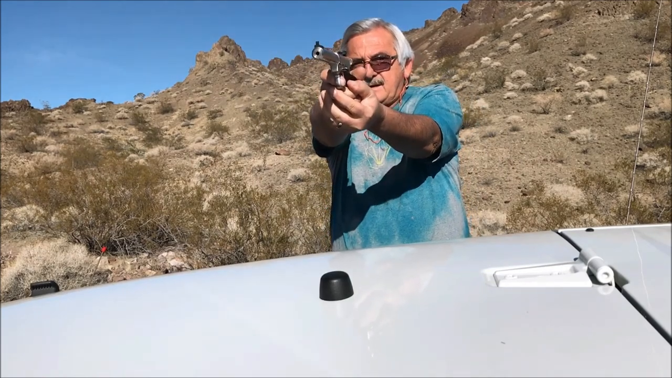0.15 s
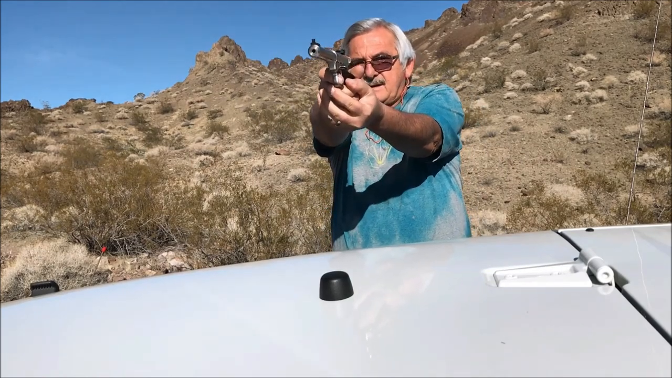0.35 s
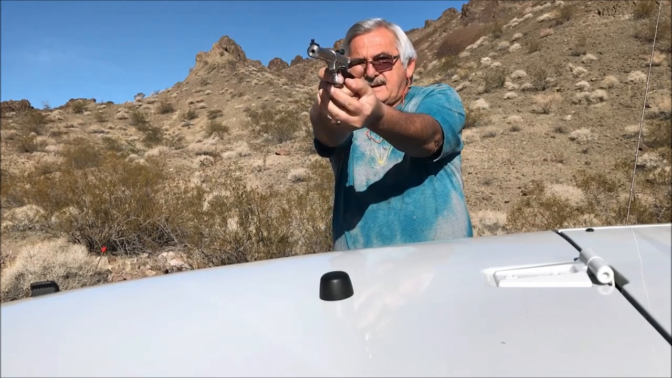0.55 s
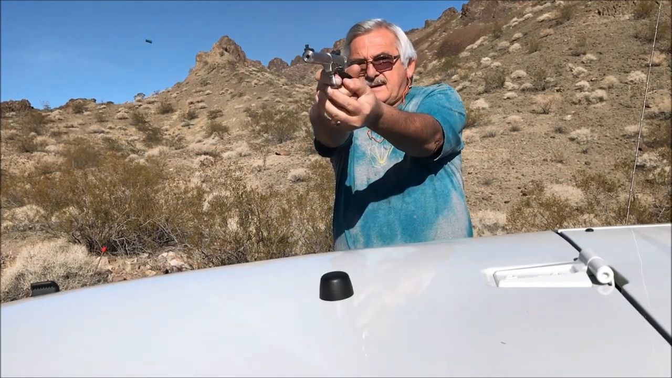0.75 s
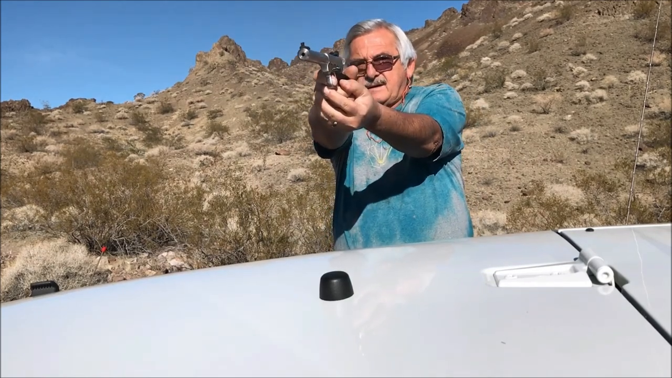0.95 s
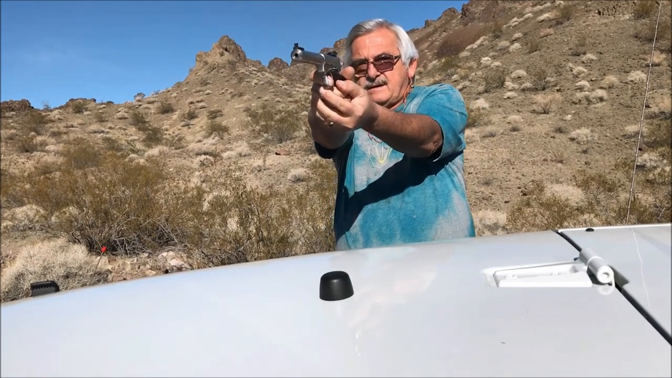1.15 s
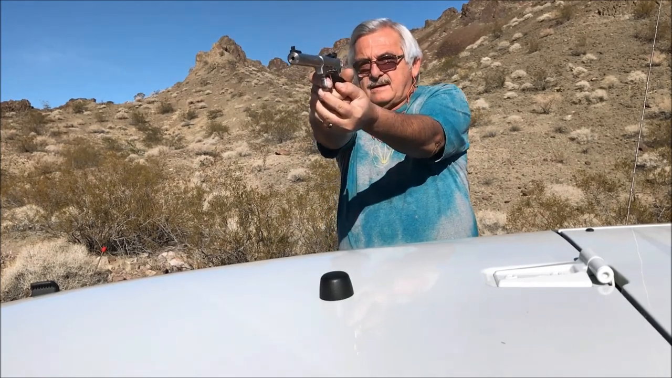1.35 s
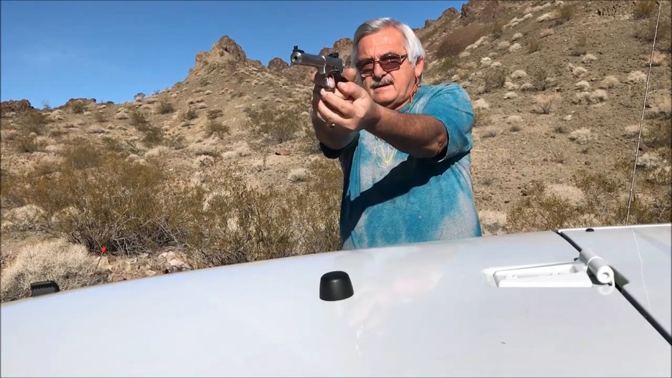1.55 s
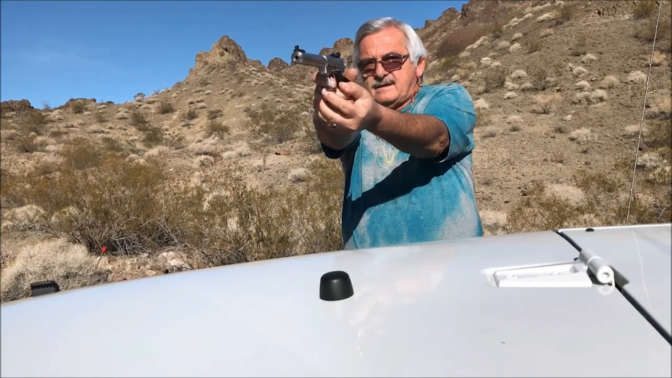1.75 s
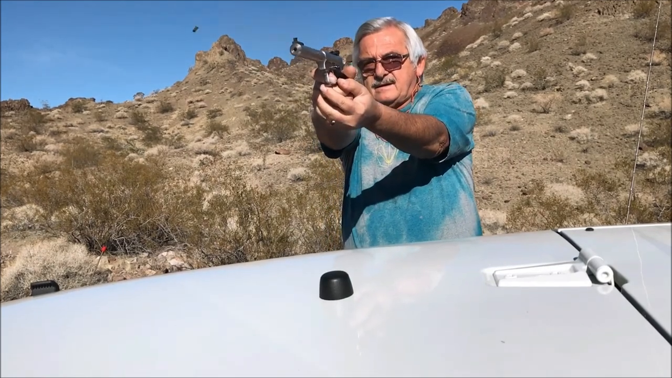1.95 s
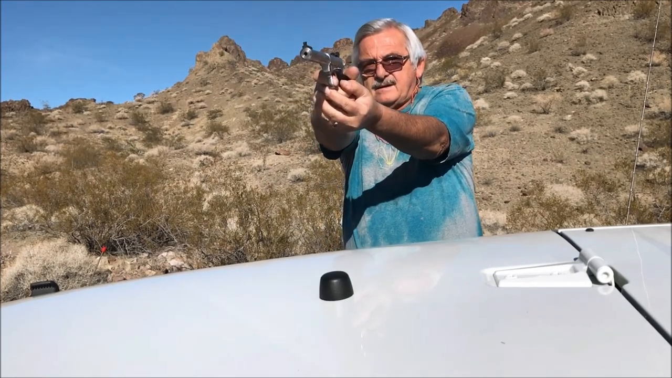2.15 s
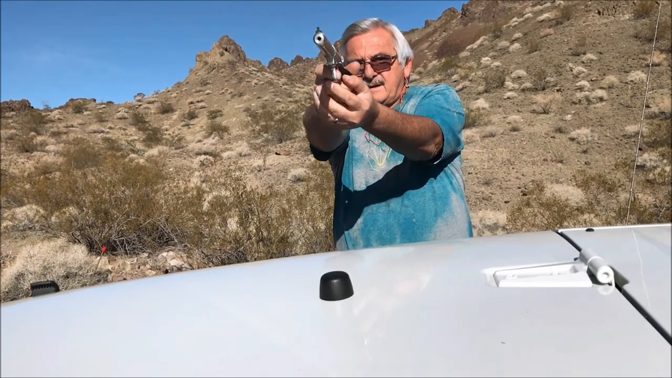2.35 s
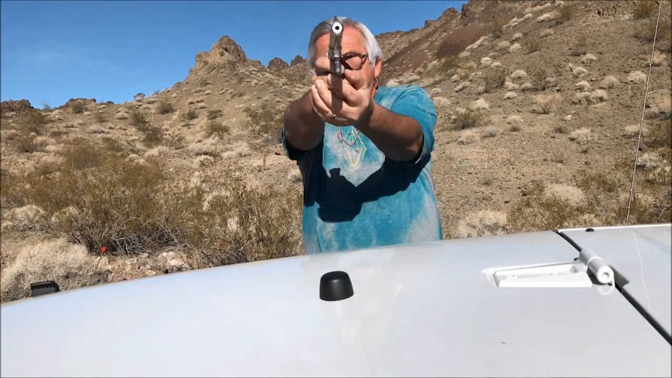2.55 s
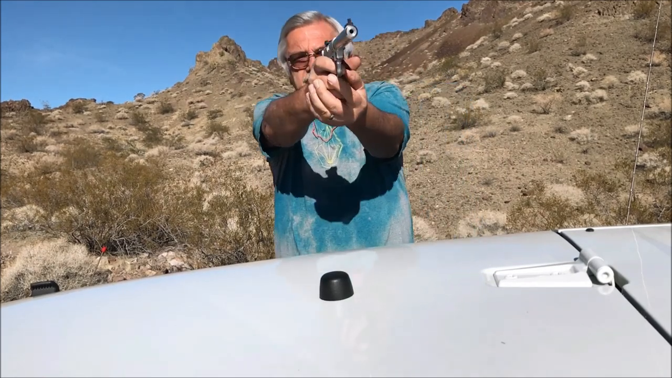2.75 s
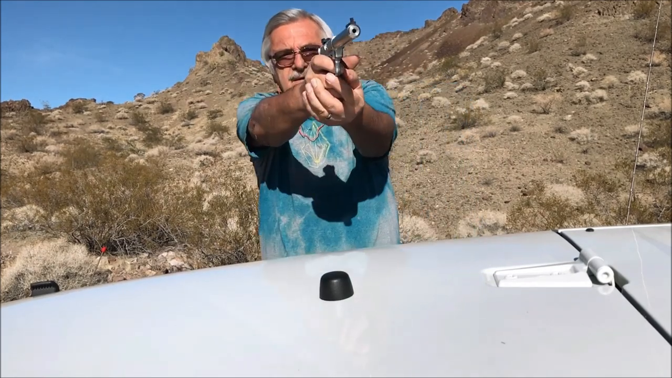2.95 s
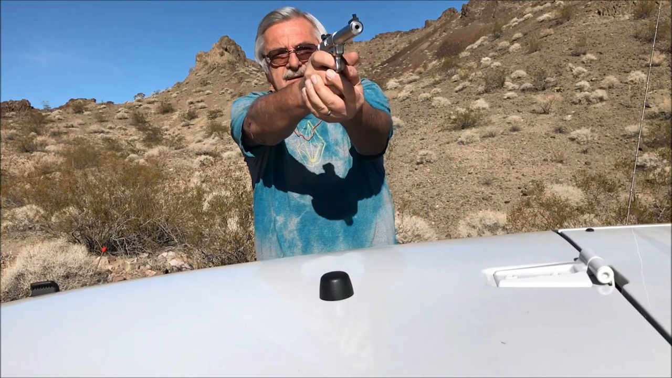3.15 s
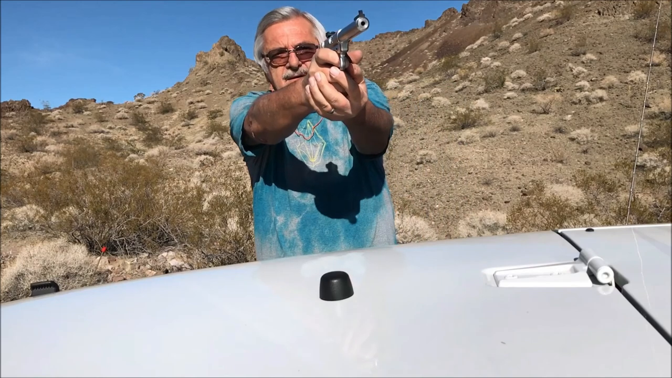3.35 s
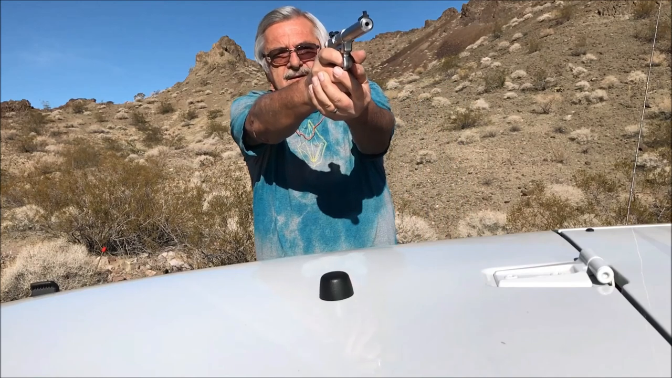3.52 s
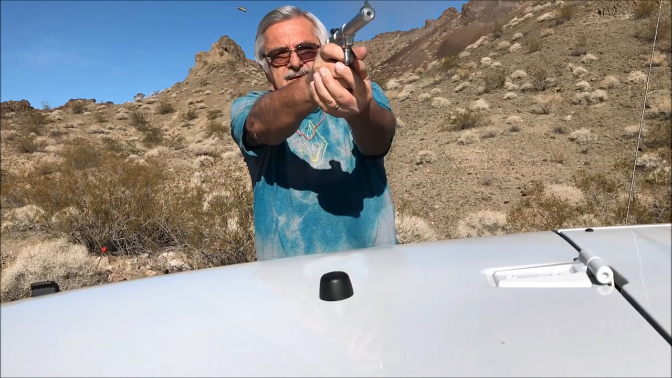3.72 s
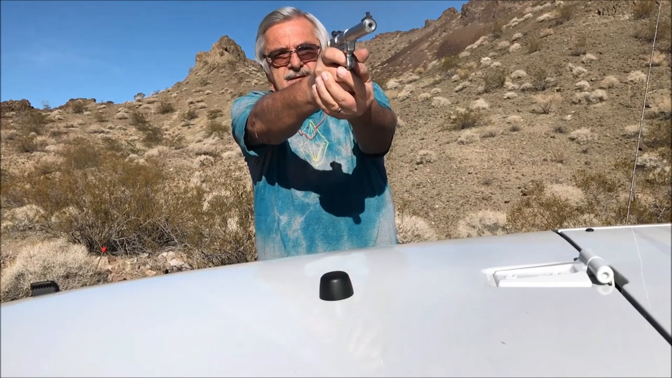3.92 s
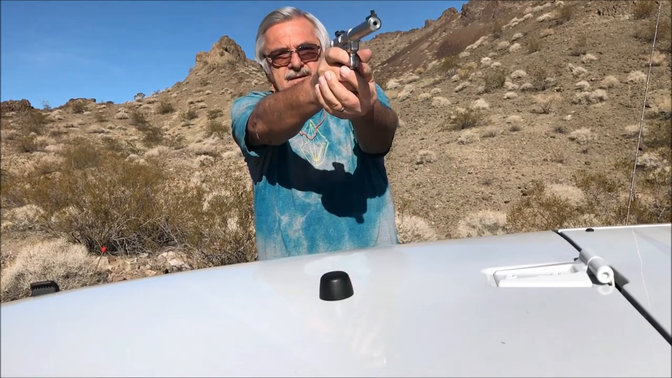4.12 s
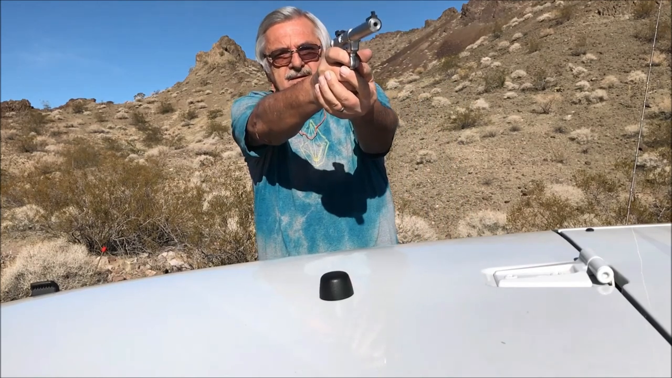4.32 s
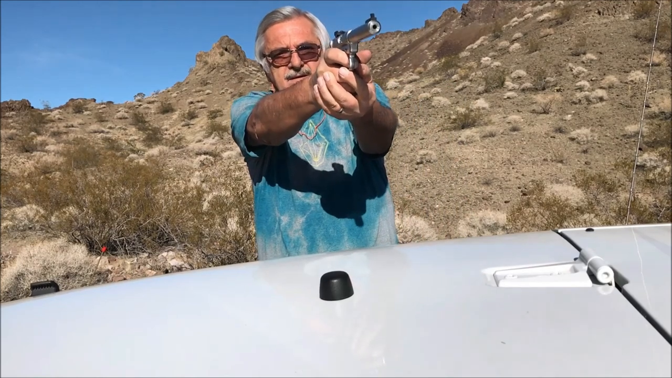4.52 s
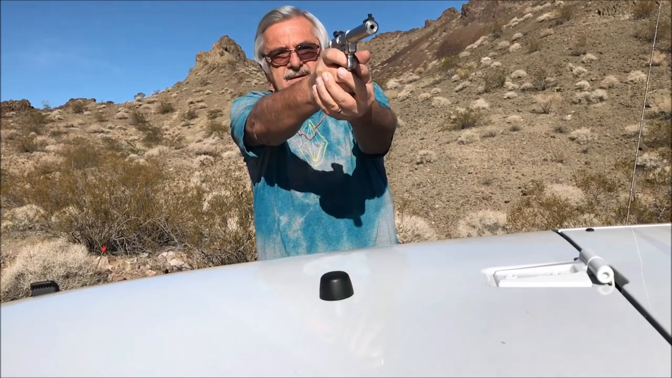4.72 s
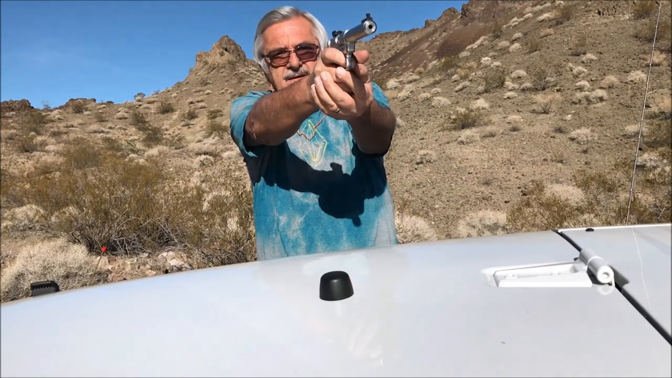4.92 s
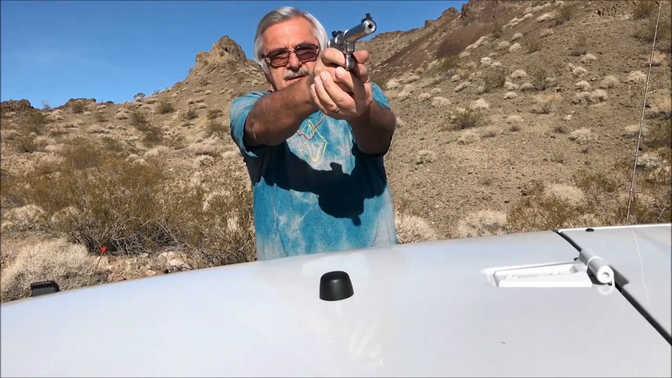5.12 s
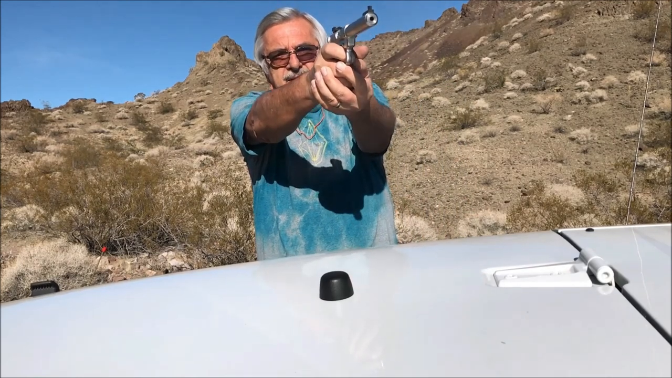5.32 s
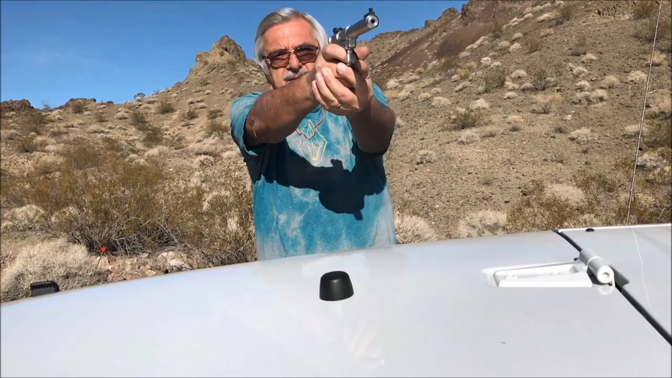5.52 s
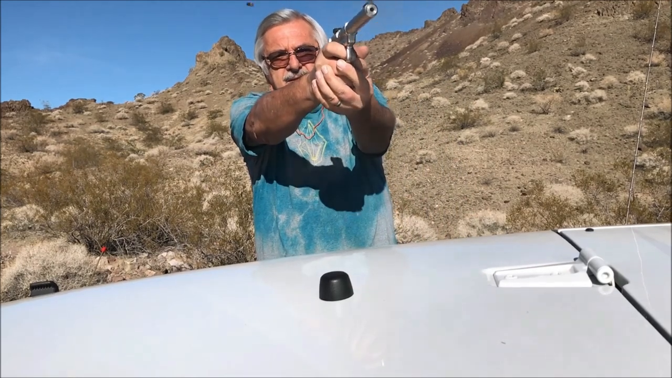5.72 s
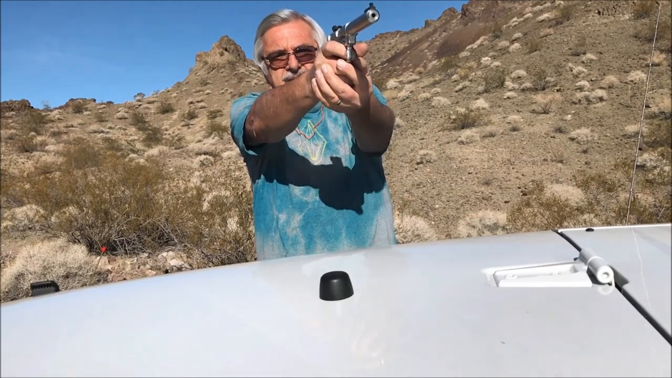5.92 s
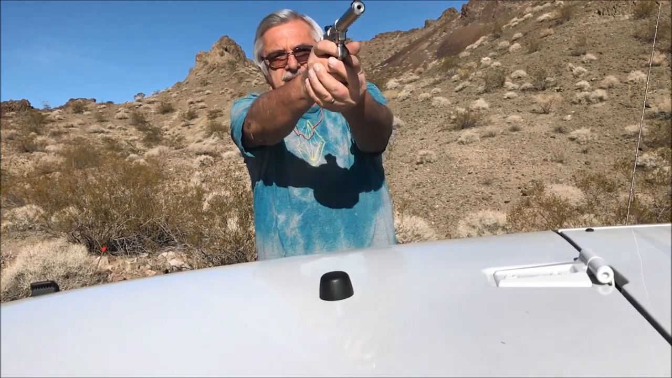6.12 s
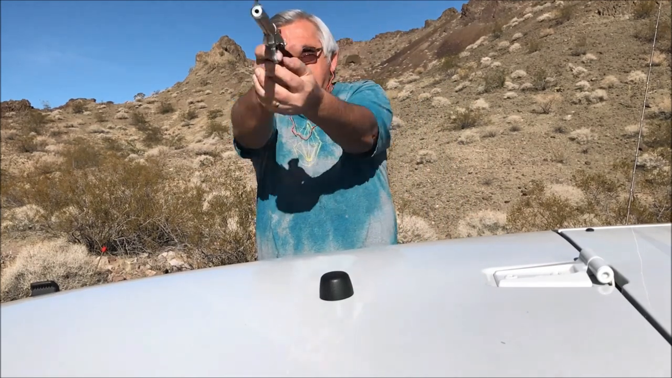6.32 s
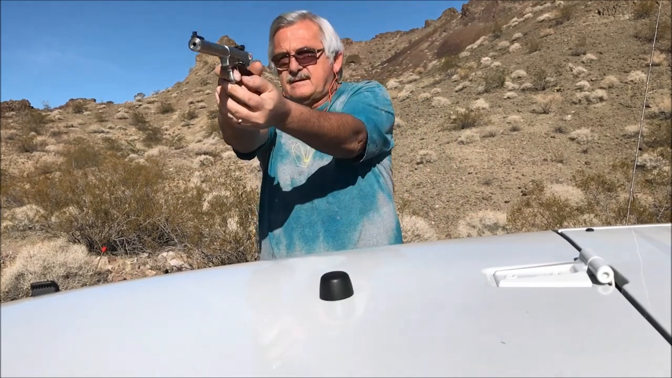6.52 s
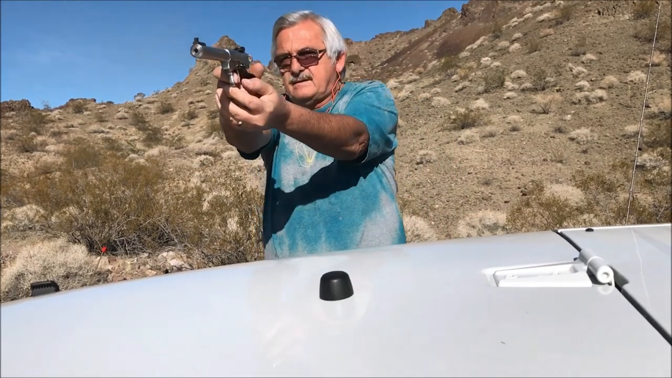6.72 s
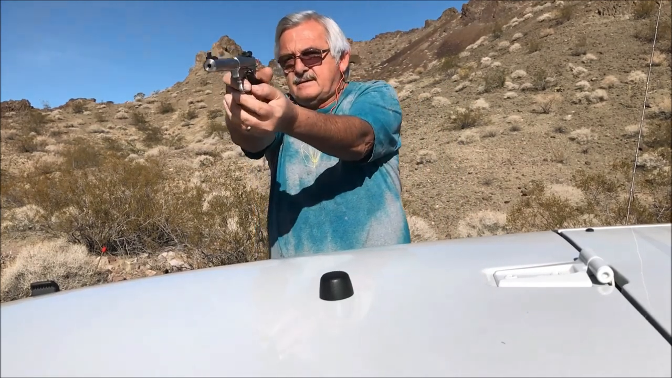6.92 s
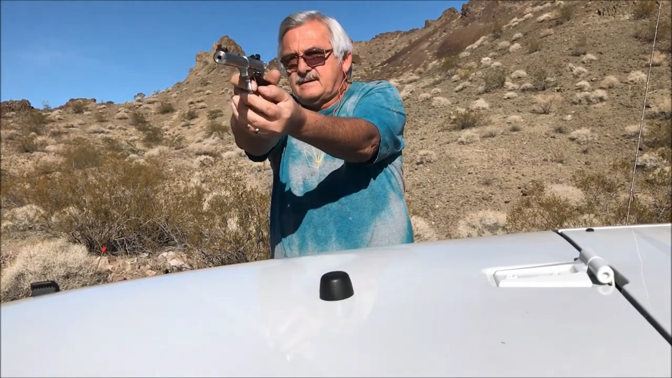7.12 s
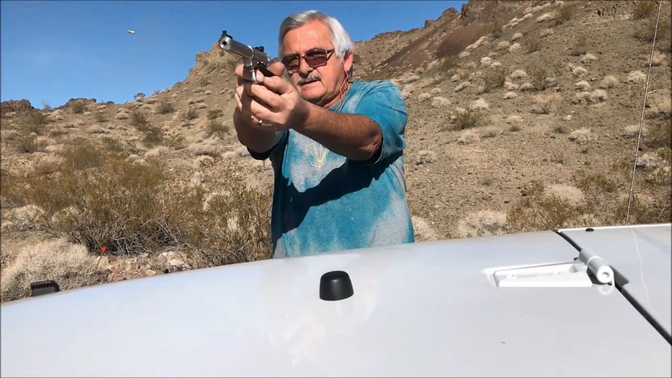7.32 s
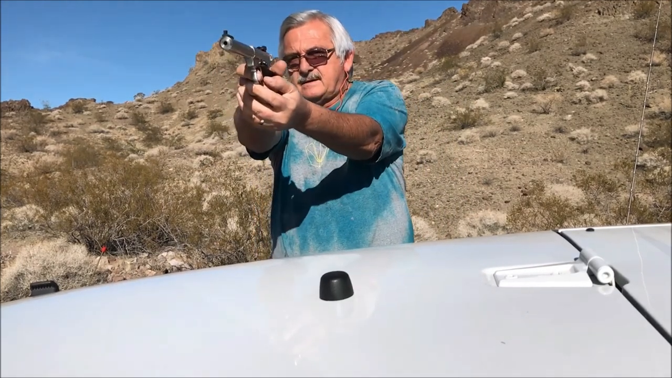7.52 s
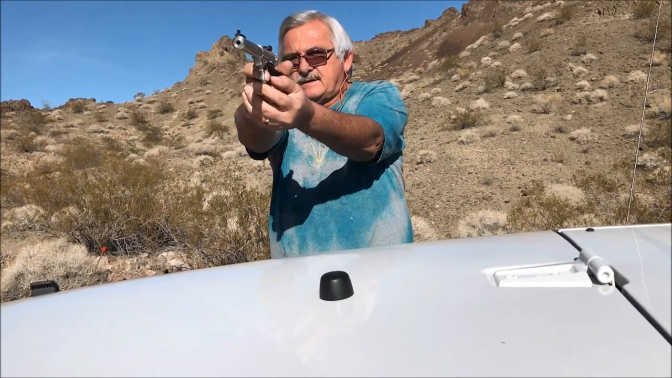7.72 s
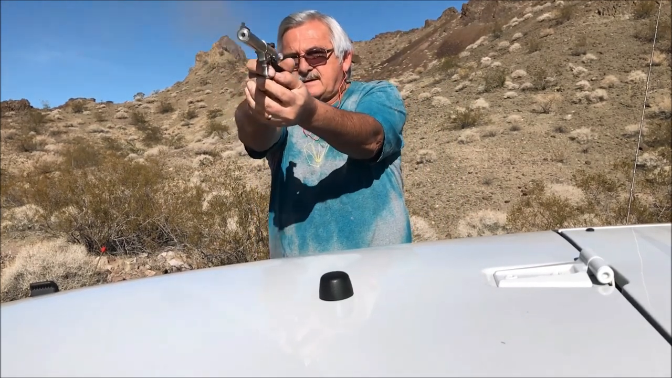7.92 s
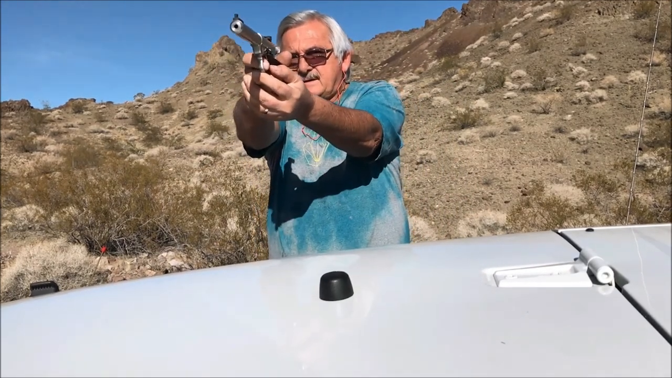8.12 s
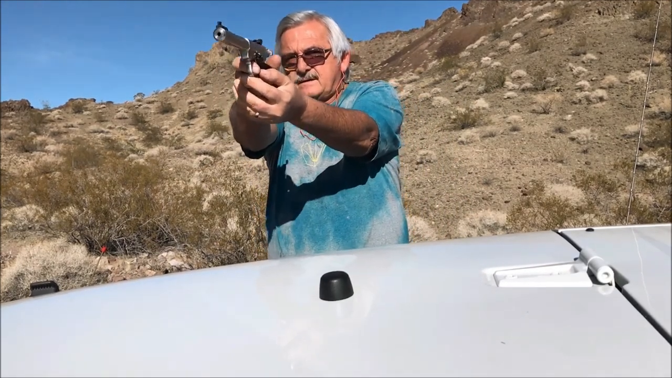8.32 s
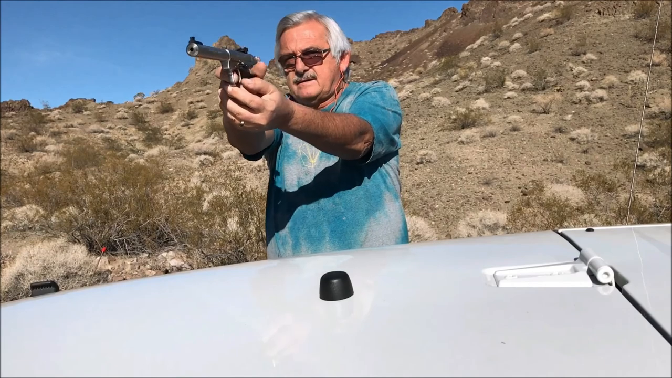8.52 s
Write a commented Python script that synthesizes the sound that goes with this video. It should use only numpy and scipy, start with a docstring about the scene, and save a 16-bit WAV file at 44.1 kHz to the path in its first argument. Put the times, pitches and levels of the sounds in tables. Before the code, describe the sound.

A small pistol fires nine separate shots outdoors, very close to the microphone, unevenly spaced at first, then faster. Each overloaded crack has a brief low thump, ringing sheet metal and scattered ground noise. A rocky hillside returns a faint wash and slaps; distant hills murmur over a second later. Between shots come tiny trigger ticks, metallic clinks and low bumps, over soft wind that dips after every blast.

```python
"""A small pistol fires nine times over a car bonnet in open desert, close to the microphone.
Each shot is a sharp blast, a noisy roar, a low thump, ringing sheet metal and scattered noise.
A rocky hillside answers with a wash and slaps; far hills roll back over a second later.
A click and swelling tones lead into each shot. Filtered noise makes trigger ticks and case clinks;
low sweeps make bumps. The wind is shaped noise that sinks after every shot and creeps back, over hiss."""
import sys
import numpy as np
from scipy import signal
from scipy.fft import rfft, irfft, next_fast_len
from scipy.io import wavfile
from scipy.ndimage import uniform_filter1d, map_coordinates

SR = 44100
rng = np.random.default_rng(int(sys.argv[2]) if len(sys.argv) > 2 else 0)


def dump_mix(stems):
    """Bounce the given channels to the path in sys.argv[1] as a 16-bit WAV at rate SR."""
    frames = np.atleast_2d(stems).T  # one column per channel
    limited = np.clip(frames, -1, 1)  # hard clip at full scale
    pcm = np.round(limited * 32767).astype(np.int16)
    wavfile.write(sys.argv[1], SR, pcm)


N = 377448  # length in samples


def amp(db):
    """Turn a level in dB into a gain."""
    return 10 ** (np.asarray(db) / 20)


def unit(x):
    """Scale a sound to an rms of 1."""
    return x / np.sqrt(np.mean(x ** 2) + 1e-20)


def along(points, hz):
    """Read a value between (frequency, value) points on a log frequency axis."""
    f, value = np.transpose(points)
    return np.interp(np.log(hz + 1), np.log(f + 1), value)


def noise(spectrum, size=N):
    """Make random noise with the given balance of frequencies, at rms 1."""
    m = next_fast_len(size)
    white = rfft(rng.standard_normal(m))
    gain = amp(along(spectrum, np.fft.rfftfreq(m, 1 / SR)))
    return unit(irfft(white * gain, m)[:size])


def wobble(rate, size=N):
    """Draw a smooth random curve through `rate` random points a second."""
    points = rng.standard_normal(int(size * rate / SR) + 4)
    return map_coordinates(points, [np.arange(size) * rate / SR])


def ring(modes, t, scatter_db):
    """Add up fading sine tones, with new strengths and starting phases at each call."""
    total = 0
    for hz, db, t60 in modes:
        level = amp(db + rng.normal(0, scatter_db) - 60 * t / t60)
        total = total + level * np.sin(2 * np.pi * (hz * t + rng.random()))
    return total


def puff(hz, width_hz, t60, t, attack=0.00068):
    """Make a short burst of noise by passing it through the same resonance twice, then fading it."""
    f = np.fft.rfftfreq(len(t), 1 / SR)
    band = (f * width_hz / (hz * hz - f * f + 1j * f * width_hz)) ** 2
    hum = unit(irfft(rfft(rng.standard_normal(len(t))) * band, len(t)))
    return hum * amp(-60 * t / t60) * (1 - np.exp(-t / attack))


def add(out, s, x):
    """Mix x into out, starting at time s in seconds."""
    part = out[round(s * SR):][:len(x)]
    part += x[:len(part)]


SINK_DB = 18.5  # how far the background drops
SINK_S, STAY_S, RETURN_S = 0.28, 0.49, 0.48  # way down, start of the way back, length of the way back


def sinking_db():
    """Drop the background level after each shot, hold it down, then let it climb back."""
    shot_times = np.array([EARLIER_SHOT[0]] + [row[0] for row in SHOTS])
    since = np.arange(N) / SR - shot_times[:, None]
    depth = np.minimum(since / SINK_S, 1 - (since - STAY_S) / RETURN_S)
    return -SINK_DB * np.clip(depth, 0, 1).max(axis=0)


# wind strength before the sinking: t/s, level/dB
WIND_STRENGTH = [(0, -52), (.6, -55.5), (1.3, -54.5), (1.6, -54.5), (2.0, -54), (2.8, -52.5), (3.2, -53.5),
                 (3.75, -49.5), (4.05, -47.5), (4.3, -53.5), (4.55, -50.5), (4.9, -53.5), (5.3, -54.5),
                 (6.5, -55), (6.8, -51.5), (7.6, -58.5), (8.0, -52), (8.56, -57.5)]
# tone colour of the buffeting: f/Hz, relative level/dB
BUFFETING = [(15, -38.5), (25, -10), (38, -6.5), (64, 3.5), (156, -4), (220, -10), (290, -33), (480, -120)]
# tone colour of the hollow body of the wind: f/Hz, relative level/dB
WIND_BODY = [(76, -33), (130, -7), (189, -5.5), (248, -11), (330, -17), (430, -27), (550, -31),
             (720, -65.5), (1210, -120)]
# tone colour of light air and of the dull far echo: f/Hz, relative level/dB
MURMUR = [(240, -30.5), (400, -1), (800, -4), (1400, -8), (1700, -24.5), (2500, -50)]
# tone colour of the steady hiss: f/Hz, relative level/dB
HISS = [(880, -26.5), (1500, -0.5), (1850, -4), (3030, -5.5), (5050, -11), (10400, -14.5), (15200, -16),
        (16500, -26.5)]
BODY_DB, AIR_DB = -8.5, -35  # hollow body and light air, over the buffeting
HISS_DB = -85


def wind():
    """Wind pushes harder than it pulls; a hollow body and light air follow its strength, over hiss."""
    strength = amp(np.interp(np.arange(N) / SR, *np.transpose(WIND_STRENGTH)) + sinking_db())
    push = noise(BUFFETING)
    lopsided = push ** 2 - uniform_filter1d(push ** 2, size=1500)  # makes the pushes larger than the pulls
    push = unit(amp(1.5 * wobble(14)) * (push + .25 * lopsided))
    body = unit(amp(2.5 * wobble(27) + 1.4 * wobble(5.3)) * noise(WIND_BODY))
    air = amp(AIR_DB) * noise(MURMUR)
    return strength * (push + amp(BODY_DB) * body + air) + amp(HISS_DB) * noise(HISS)


# slide, cases and grip: t/s, level/dB before the fade, centre f/Hz, resonance width f/Hz
CLINKS = [(.045, -68, 1190, 1500), (.387, -66, 1480, 1500), (1.985, -57.5, 3974, 4000),
          (2.793, -54, 1215, 1190), (3.902, -37, 4295, 4000), (3.924, -50, 5500, 2000),
          (5.914, -45, 3500, 2500), (6.255, -51, 396, 397), (6.667, -55, 5620, 3000),
          (6.755, -27, 5880, 6135), (6.782, -32, 2200, 2500), (7.412, -37.5, 3420, 3040),
          (8.152, -51.5, 4990, 4050)]


def clinks():
    """Small metal parts knock together, each as a short puff of noise around one frequency."""
    out, t = np.zeros(N), np.arange(SR // 5) / SR
    for s, db, hz, width_hz in CLINKS:
        add(out, s, amp(db) * puff(hz, width_hz, .024, t))  # falls 60 dB in .024 s
    return out


# trigger and sear: t/s, level/dB, spring level/dB over it
TICKS = [(0.2423, -41.5, -18), (0.2484, -47.5, -24), (0.3351, -55.5, -14), (0.3444, -65.5, -4),
         (0.5222, -61.5, -24), (1.5075, -57.5, -3.5), (2.7706, -51, -15), (3.05, -57.5, -11),
         (3.1847, -57.5, -31.5), (4.5865, -61.5, -12), (4.8708, -56, -14), (5.1123, -58.5, -16),
         (6.2103, -62.5, -11), (6.3654, -68, -11), (6.6144, -45, -16), (6.6408, -52, -30.5),
         (7.1681, -57.5, -11.5), (7.7438, -63.5, -14), (7.9838, -55, -15.5)]
# bands of the snap: centre f/Hz, resonance width f/Hz, level/dB over the tick, 60 dB fade t/s
SNAP = [(2450, 3400, -9.5, 0.012), (8800, 80, -34.5, .1), (9400, 3800, -6, 0.0037),
        (15280, 1500, -4.5, .012)]
# sear, the catch that holds the hammer: centre f/Hz, resonance width f/Hz, 60 dB fade t/s
SEAR = (5590, 670, 0.018)
# spring: centre f/Hz, resonance width f/Hz, 60 dB fade t/s
SPRING = (12600, 200, .1)
SEAR_DB = -5  # over the tick


def ticks():
    """A snap in several noise bands shakes the sear and a spring, which ring as narrower bands."""
    out, t = np.zeros(N), np.arange(SR // 5) / SR
    for s, db, spring_db in TICKS:
        snap = np.zeros(len(t))
        for hz, width_hz, level_db, t60 in SNAP:
            varied = amp(level_db + rng.normal(0, 2))
            snap += varied * puff(hz, width_hz, t60, t, attack=0.00018)
        sear = amp(SEAR_DB) * puff(*SEAR, t, attack=0.00021)
        spring = amp(spring_db) * puff(*SPRING, t, attack=0.00073)
        add(out, s, amp(db) * (snap + sear + spring))
    return out


# a shot before the start whose far echo is still to come: t/s, far echo level/dB
EARLIER_SHOT = (-.585, -63.5)
# tone colour of the bright echo: f/Hz, relative level/dB
RUSH = [(240, -34), (400, -3), (700, -7.5), (1000, -8.5), (1700, -15.5), (2300, -21), (2900, -41),
        (4000, -70.5)]
FAR_DELAY_S, FAR_RISE_S = 1.15, .075  # wait after the shot, time scale of the rise
FAR_BRIGHT_DB_PER_S, FAR_DULL_DB_PER_S = 22, 5.5  # how fast the two parts fade
FAR_DULL_DB = -6  # starting level of the dull part over the bright one
FAR_BRIGHT_SINKS, FAR_DULL_SINKS = 0.2, .6  # share of the background's sinking that each part follows


def far_echo():
    """Shots roll back late from far hills; the bright rush fades faster, leaving a dull murmur."""
    s, db = np.transpose([EARLIER_SHOT] + [(row[0], row[-1]) for row in SHOTS])
    late = np.maximum(np.arange(N) / SR - s[:, None] - FAR_DELAY_S, 0)
    rise = 1 - np.exp(-(late / FAR_RISE_S) ** 2)

    def level(db_per_s):
        """Add the power of all the echoes, since noise adds by power."""
        each = rise * amp(db[:, None] - db_per_s * late)
        return np.sqrt(np.sum(each ** 2, axis=0))

    sinking = sinking_db()
    bright = amp(FAR_BRIGHT_SINKS * sinking) * level(FAR_BRIGHT_DB_PER_S) * noise(RUSH)
    dull = amp(FAR_DULL_DB + FAR_DULL_SINKS * sinking) * level(FAR_DULL_DB_PER_S) * noise(MURMUR)
    return amp(1.8 * wobble(30) + 1.9 * wobble(8)) * (bright + dull)


# one row before each shot: t/s, click level/dB, low tone f/Hz, low level/dB, high tone f/Hz,
# high level/dB, size of the swell level/dB
LEAD = [(0.7179, -24, 792.7, -18.5, 2600, -7.5, 34.5), (2.001, -25, 450.7, -14.5, 1396, -22, 22),
        (3.7772, -22.5, 809.8, -16, 2800, -11.5, 25.5), (5.2897, -25.5, 950.6, -8, 3000, -22.5, 26.5),
        (5.7894, -40, 502.3, -25.5, 1200, -27, 19.5), (6.6839, -26.5, 995.3, -16, 3000, -16.5, 22.5),
        (6.9002, -50.5, 686, -20, 3006, -44, 33), (7.3132, -38.5, 503.6, -22.5, 3000, -33.5, 25.5),
        (8.0245, -30, 501.4, -17, 2995, -25.5, 24)]
TONES_WAIT_S = .007  # the tones set in after the click


def lead_in():
    """A noisy click, then two groups of close tones and a rough band swell for about 20 ms."""
    out = np.zeros(N)
    for (s, click_db, low_hz, low_db, high_hz, high_db, swell_db), shot in zip(LEAD, SHOTS):
        t = np.arange(round((shot[0] - s) * SR)) / SR
        swell = amp(-swell_db * (1 - t / t[-1])) * (1 - np.exp(-(t / TONES_WAIT_S) ** 3))
        fade = amp(-60 * t / 0.02) + 0.22  # some of the click noise stays until the shot
        click = amp(click_db) * fade * (1 - np.exp(-t / .0008)) * noise(REPORT, size=len(t))
        low_tones = [(low_hz, -3, 5), (low_hz * 1.3, -8, 5), (low_hz * .6, -8, 5)]
        low = amp(low_db) * ring(low_tones, t, scatter_db=3)
        high_tones = [(high_hz, -2, 5), (high_hz * 1.08, -8, 5), (high_hz * .8, -11, 5)]
        high = amp(high_db) * ring(high_tones, t, scatter_db=2)
        rough = amp(low_db - 11) * puff(low_hz * 1.4, 1500, 5, t)
        add(out, s, click + swell * (low + high + rough))
    return out


def blast(t):
    """A sharp shock, then about two swings of the gas column leaving the barrel."""
    shock = -np.exp(-((t - .0002) / .00009) ** 2)
    late = np.maximum(t - .0003, 0)
    return shock + .8 * np.sin(2 * np.pi * 750 * late) * np.exp(-(late / .0026) ** 4)


# tone colour of the roar and of the click before it: f/Hz, relative level/dB
REPORT = [(59, -29.5), (100, -1), (518, -1.5), (1050, -4), (2310, -14.5), (3120, -6.5), (3470, -13),
          (4290, -11.5), (4990, -16), (5670, -14.5), (14800, -29.5), (16500, -46.5)]


def roar(t, db, hold):
    """Uneven noise stays loud while the microphone is overdriven, then dies quickly."""
    held = amp(-60 * np.maximum(t - hold, 0) / 0.053)
    onset = 1 - .5 * np.exp(-t / 0.00072)  # starts at half strength
    return amp(db + 1.9 * wobble(500, size=len(t))) * held * onset * noise(REPORT, size=len(t))


SETTLE_DB = -14  # slow swing over the thump


def thump(t, db, hold):
    """A low swing grows during the overload and dies away, over a slower 30 Hz swing."""
    cycle = t / (hold + 0.0079)  # reaches 1 when the swing is fully grown
    fade = amp(-60 * np.maximum(cycle - 1, 0) / 0.99)
    swing = -amp(db) * np.sin(3 * np.pi * cycle) * np.clip(cycle, 0, 1) * fade
    settling = amp(db + SETTLE_DB) * np.sin(2 * np.pi * 30 * t) * amp(-60 * t / 0.12)
    return swing + settling


# ringing tones of the sheet metal: f/Hz, level/dB over the bonnet level, 60 dB fade t/s
BONNET = [(135, -10, .18), (197.5, -5.5, .22), (211, -6, 0.28), (255.6, 3.5, 0.2), (347, -17.5, 0.11),
          (366, -17, .2), (491.4, -7.5, .1), (613, -10, 0.12), (720, -9.5, .08)]


def bonnet(t, db):
    """The blast makes the sheet metal ring in fading tones that build up softly."""
    return amp(db) * (1 - np.exp(-t / 0.0048)) * ring(BONNET, t, scatter_db=3)


# tone colour of the tail at its start: f/Hz, relative level/dB
TAIL = [(35, -40), (60, -18.5), (229, -4), (521, -12), (1030, -8.5), (2040, -13), (5340, -18), (7770, -28),
        (9160, -27.5), (14700, -30.5), (16500, -44.5)]
# scatter from ground and brush: f/Hz, 60 dB fade t/s
FADE = [(80, 0.081), (300, 0.21), (1000, .16), (4000, .16), (8000, 0.17), (14000, 0.2)]


def tail(t, db):
    """Stones and bushes answer unevenly: noise whose frequencies each die at their own speed."""
    hz, frame_s, z = signal.stft(noise(TAIL, size=len(t)), SR, nperseg=256)
    fading = z * amp(-60 * frame_s / along(FADE, hz)[:, None])
    scattered = signal.istft(fading, SR, nperseg=256)[1][:len(t)]
    return amp(db + 2 * wobble(130, size=len(t))) * scattered


# near ground, a gap, then the hillside: t/s after the shot, level/dB over HILL_DB
SLOPE = [(.05, 13), (.13, 2.5), (.195, -10), (.22, 0), (.3, 0), (.36, -0.4), (.5, -13), (.7, -28.5)]
# tone colour of the early wash: f/Hz, relative level/dB
HILL = [(290, -39.5), (500, -11.5), (594, -6), (755, -6.5), (898, -2.5), (1450, -2.5), (4920, -17.5),
        (5550, -16.5), (12000, -34.5), (15600, -66), (22000, -120)]
# tone colour of the late, duller wash: f/Hz, relative level/dB
HILL_LATE = [(400, -25), (800, -5.5), (1300, -0.5), (2200, -8), (4000, -24), (8000, -50)]
# tone colour of the hollow low part: f/Hz, relative level/dB
HOLLOW = [(90, -29.5), (150, -8), (195, -1), (260, -12), (350, -4), (420, -24), (600, -60)]
# rock faces that slap back: t/s after the shot, centre f/Hz, resonance width f/Hz, level/dB over HILL_DB
OUTCROP = [(.165, 8970, 8000, -6.5), (.273, 2500, 3000, 4), (.328, 3900, 2500, -4), (.339, 1210, 900, 12.5),
           (.344, 3400, 3000, -1), (.386, 2500, 3500, -2.5), (.52, 2990, 4000, -12),
           (.578, 1400, 1200, -9.5)]
HOLLOW_DB = 1  # hollow low part over the rest of the wash
DULL_FROM_S, DULL_OVER_S = .36, .15  # when the wash starts to lose treble, and how long that takes


def hillside(t):
    """Rocks at many distances return an uneven wash, duller from farther off; a few faces slap back."""
    size = len(t)
    slope_db = np.interp(t, *np.transpose(SLOPE), left=-90, right=-90)
    level = amp(slope_db + 2.2 * wobble(90, size=size) + wobble(25, size=size))
    dull = np.clip((t - DULL_FROM_S) / DULL_OVER_S, 0, 1)
    early = np.sqrt(1 - dull) * noise(HILL, size=size)
    late = np.sqrt(dull) * noise(HILL_LATE, size=size)
    wash = level * (early + late + amp(HOLLOW_DB) * noise(HOLLOW, size=size))
    for s, hz, width_hz, db in OUTCROP:
        slap = puff(hz, width_hz, .04, t, attack=.0008)
        add(wash, s, amp(db + rng.normal(0, 1.5)) * slap)
    return wash


# the nine shots: t/s, roar level/dB, overload t/s, thump level/dB, bonnet level/dB, tail level/dB,
# far echo level/dB
SHOTS = [(0.7413, -16, .016, -13.5, -26.5, -20, -62.5), (2.0228, -16, 0.018, -16, -29, -17.5, -62.5),
         (3.8004, -18.5, .022, -17.5, -23.5, -17.5, -61.5), (5.313, -17.5, 0.017, -25, -23, -19, -65),
         (5.8109, -17.5, .012, -24.5, -28.5, -21, -62), (6.707, -16, .018, -13.5, -34, -14.5, -62.5),
         (6.9221, -14, .011, -17, -37.5, -24, -63.5), (7.3355, -18, .014, -20.5, -38, -18.5, -65),
         (8.0469, -14.5, .015, -15, -33.5, -21, -66)]
BLAST_DB, HILL_DB = 7.5, -64.5  # blast over the roar, level of the hillside


def shots():
    """Each shot stacks the blast and roar, the thump, the ringing metal, the tail and the hillside."""
    out, t = np.zeros(N), np.arange(SR * 3 // 4) / SR
    for s, db, hold, thump_db, bonnet_db, tail_db, _ in SHOTS:
        muzzle = amp(db + BLAST_DB) * blast(t) + roar(t, db, hold) + thump(t, thump_db, hold)
        answer = bonnet(t, bonnet_db) + tail(t, tail_db) + amp(HILL_DB) * hillside(t)
        add(out, s, muzzle + answer)
    return out


# low knocks: t/s, strength level/dB, f/Hz passed 18.6 ms into the fall
BUMPS = [(2.375, -40, 90), (2.525, -52, 89.5), (5.936, -37.5, 91), (6.248, -34, 105.4)]


def bumps():
    """Low knocks: a sine swing that falls in pitch while it swells and dies."""
    out, t = np.zeros(N), np.arange(SR // 5) / SR
    for s, db, hz in BUMPS:
        turns = hz * .03 * np.log(1 + t / 0.0114)
        swell = t / 0.0098 * np.exp(-t / 0.0092)
        add(out, s, amp(db) * np.sin(2 * np.pi * turns) * swell)
    return out


def scene():
    """Add up all the sources at one microphone."""
    return (wind() + clinks() + ticks() + far_echo() + lead_in() + shots() + bumps())[None]


TOP_HZ = 16640  # nothing from here up is kept


def record(dry):
    """Round off the loud peaks towards a ceiling of .68, then cut the highest frequencies."""
    x = dry / (1 + np.abs(dry / .68) ** 4) ** (1 / 4)
    m = next_fast_len(N)
    keep = np.fft.rfftfreq(m, 1 / SR) < TOP_HZ
    return irfft(rfft(x, m) * keep, m)[:, :N]


dry = scene()
out = record(dry)
dump_mix(out)
```